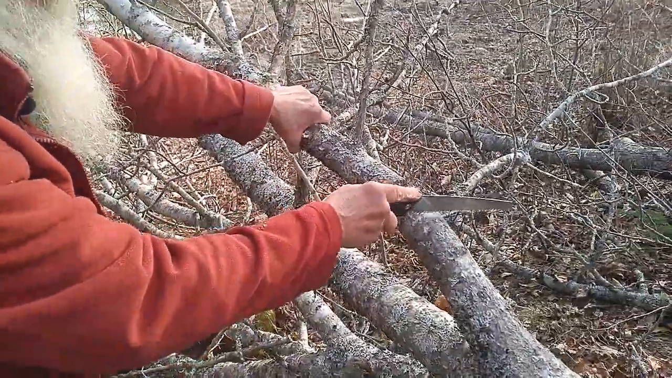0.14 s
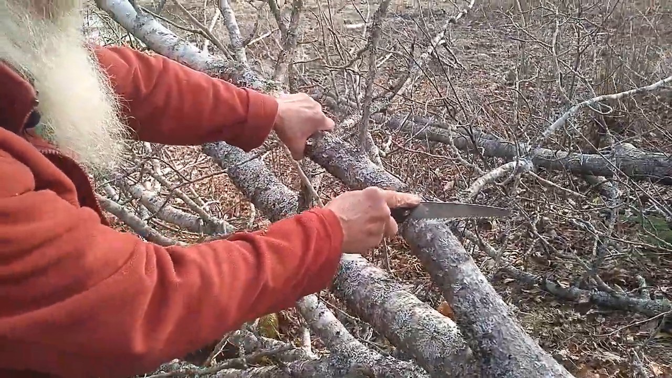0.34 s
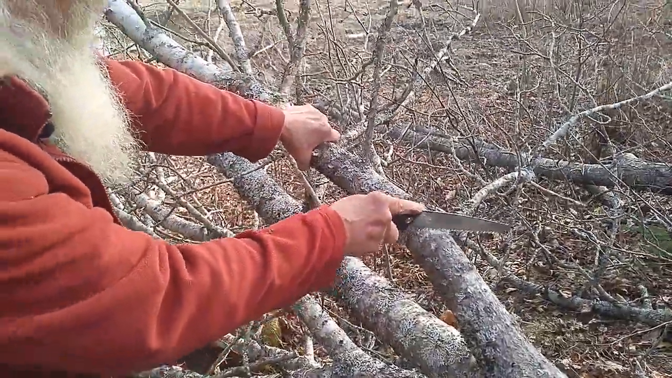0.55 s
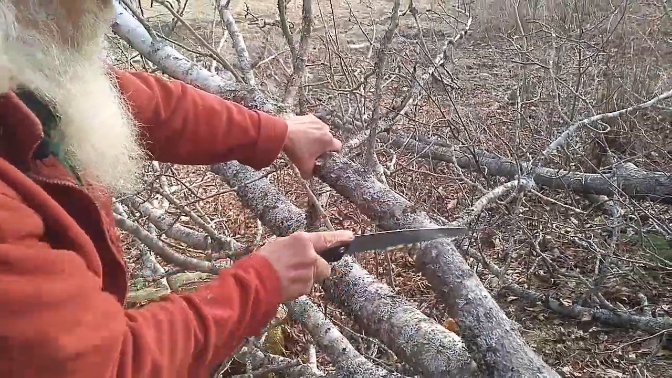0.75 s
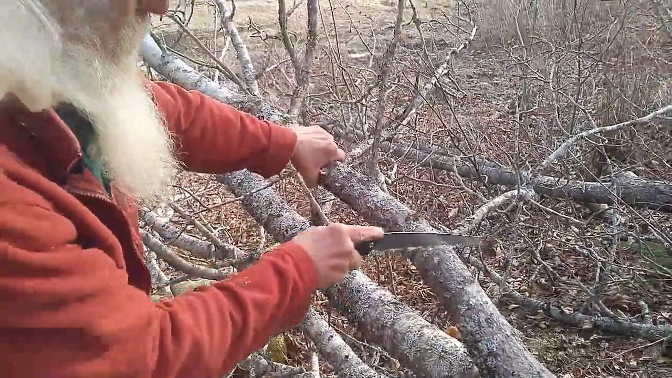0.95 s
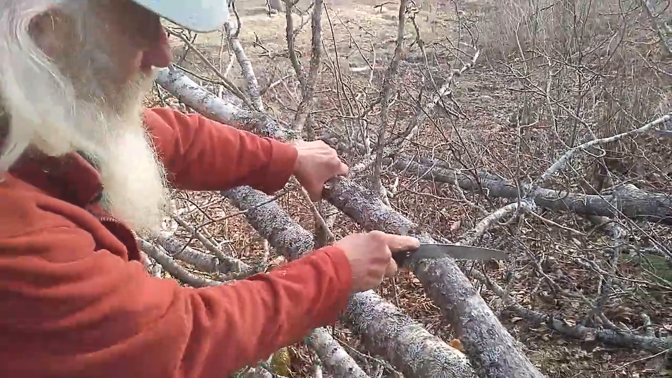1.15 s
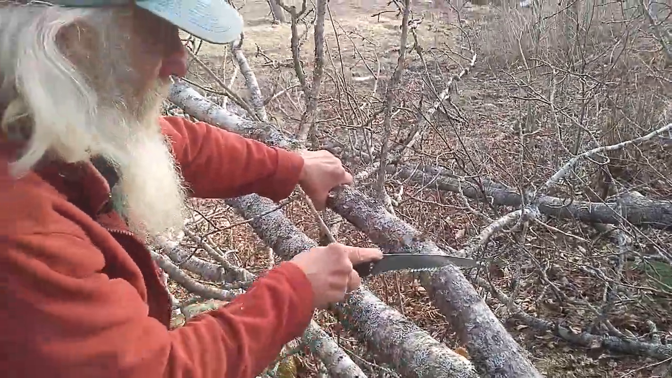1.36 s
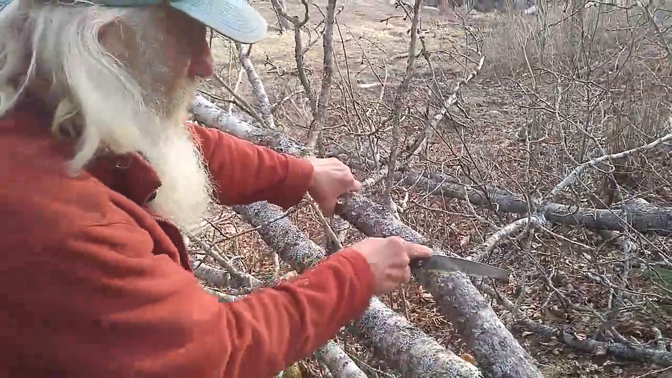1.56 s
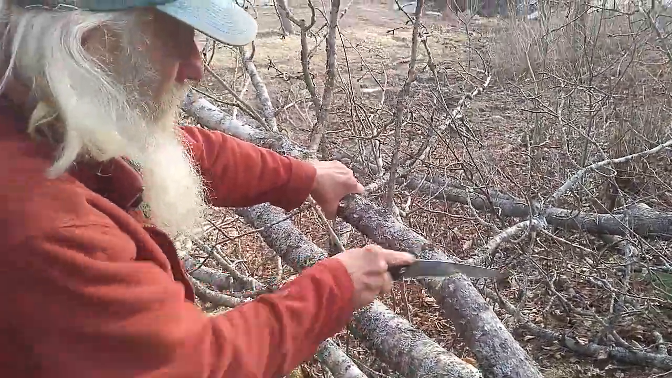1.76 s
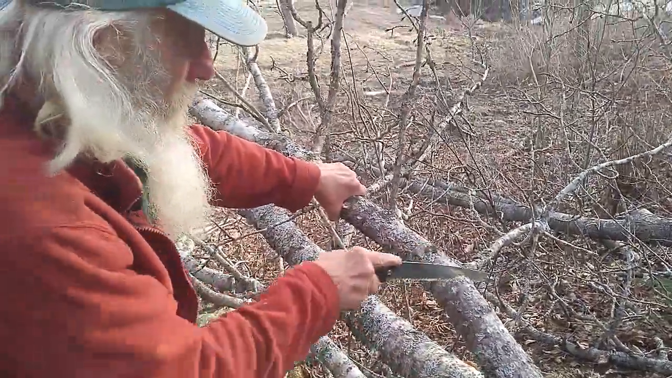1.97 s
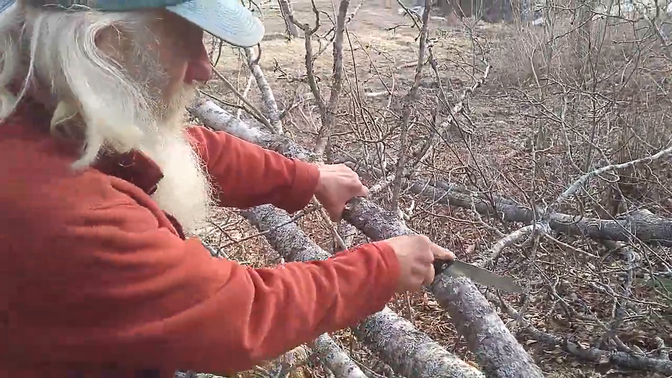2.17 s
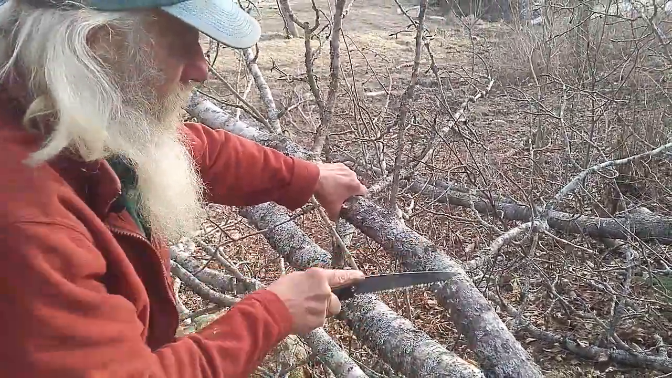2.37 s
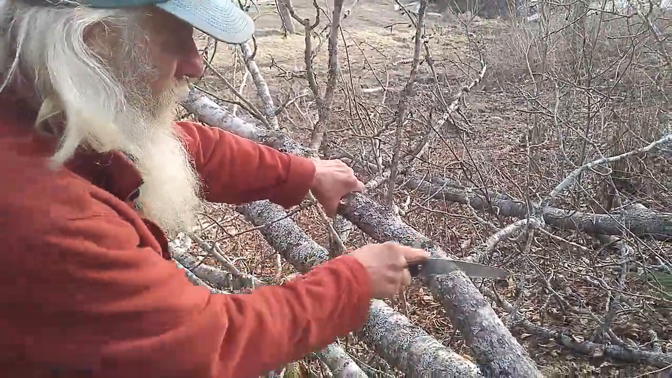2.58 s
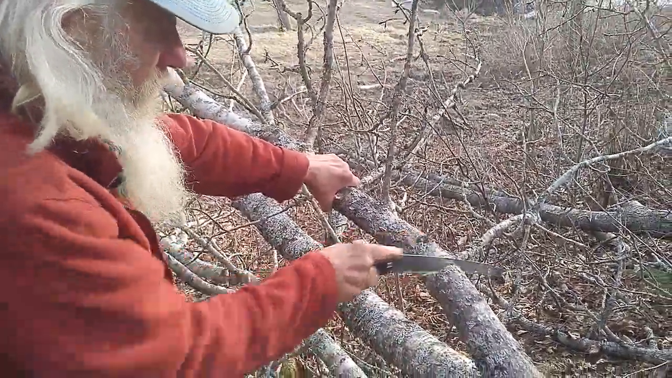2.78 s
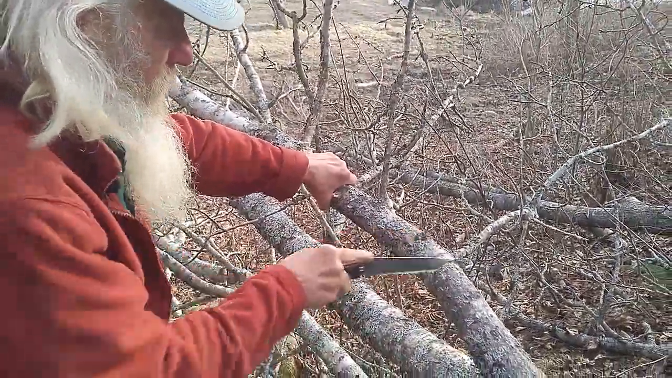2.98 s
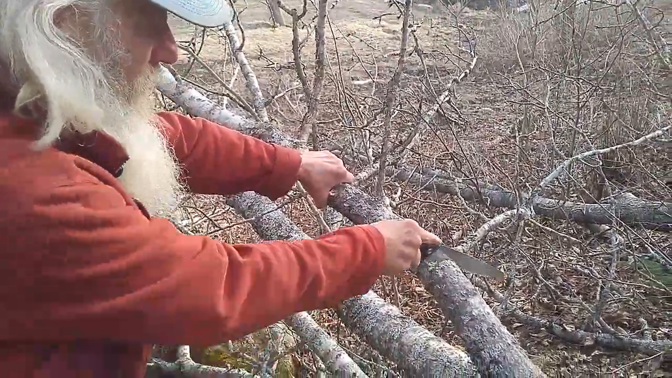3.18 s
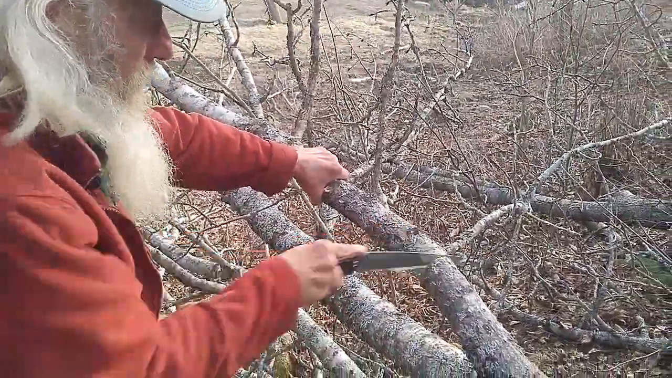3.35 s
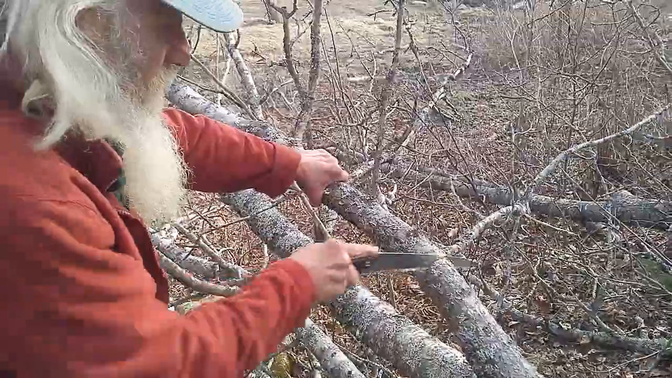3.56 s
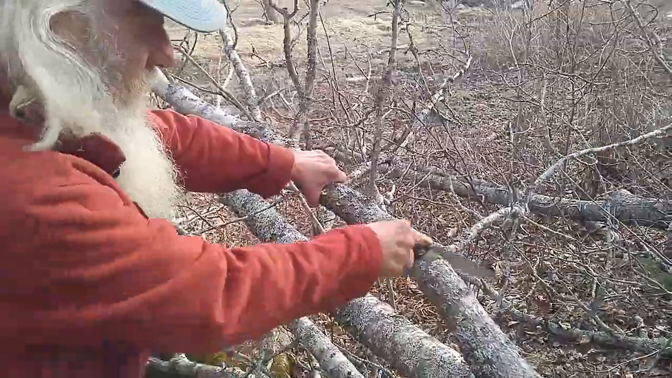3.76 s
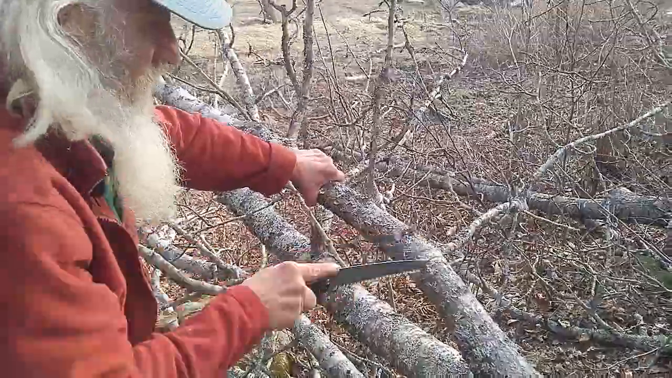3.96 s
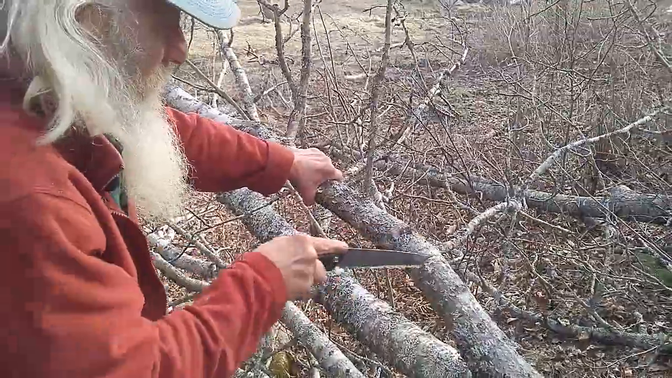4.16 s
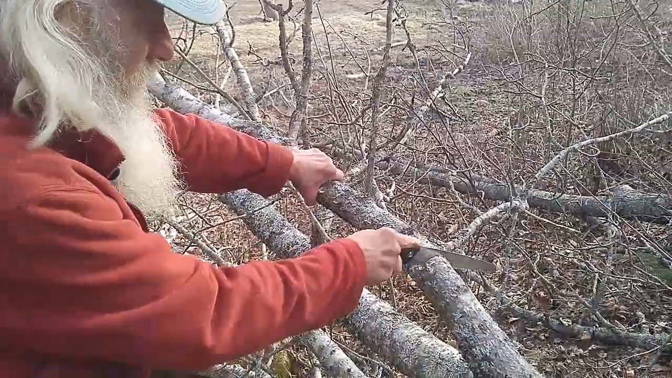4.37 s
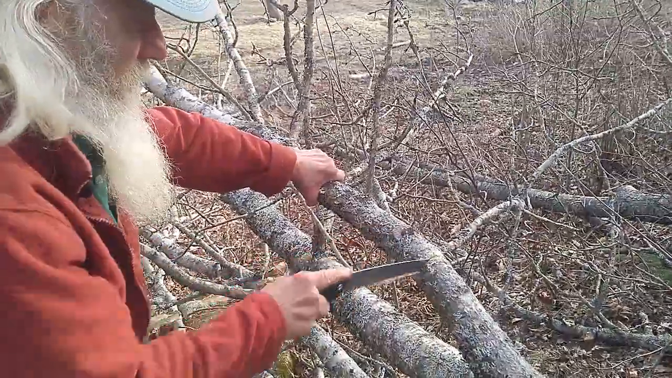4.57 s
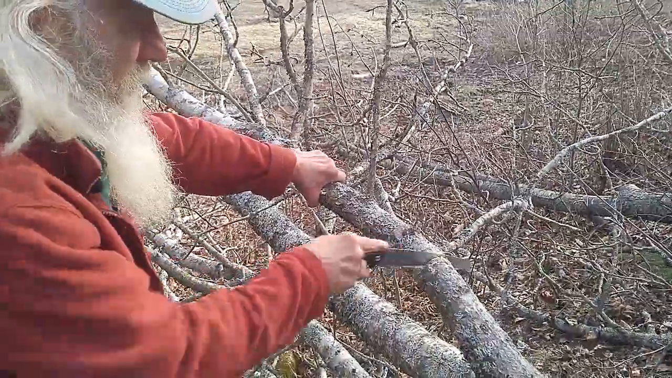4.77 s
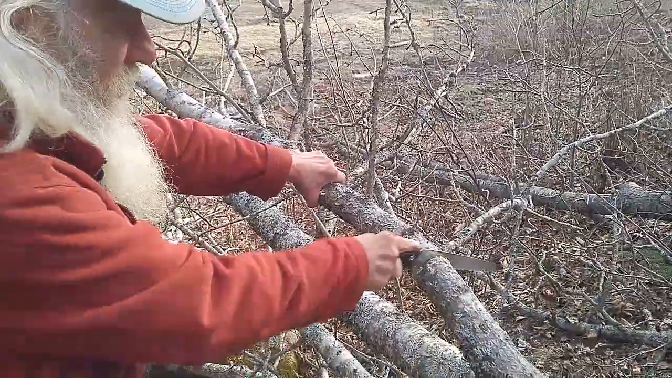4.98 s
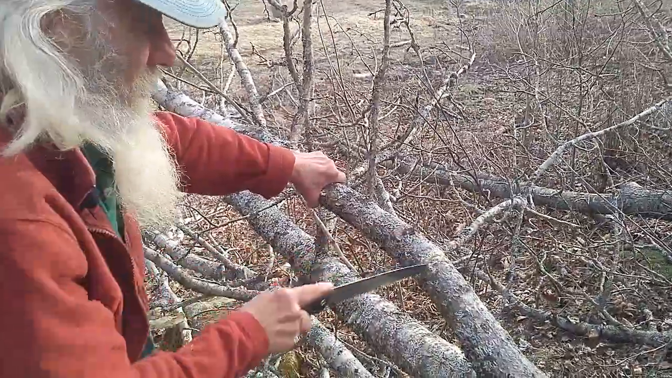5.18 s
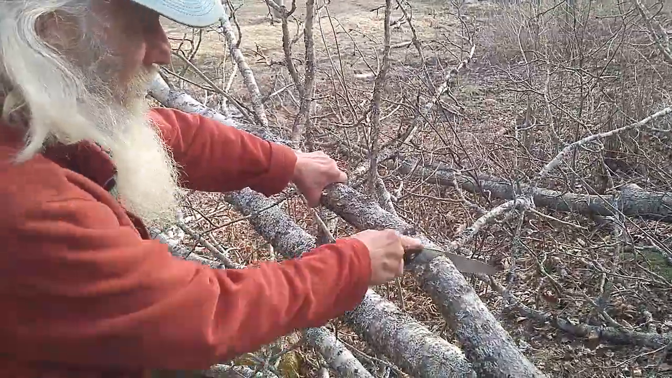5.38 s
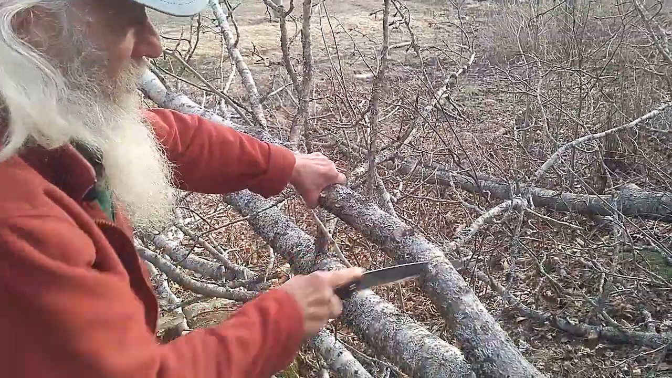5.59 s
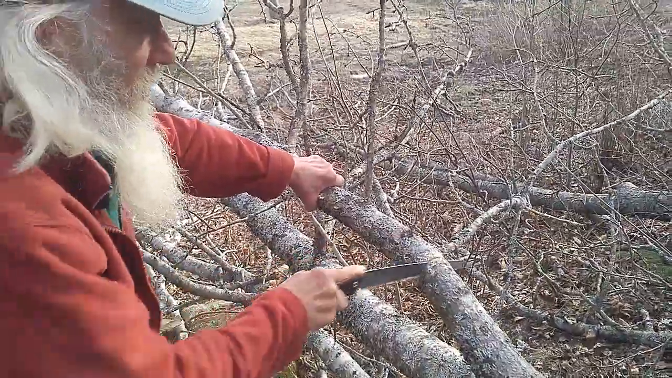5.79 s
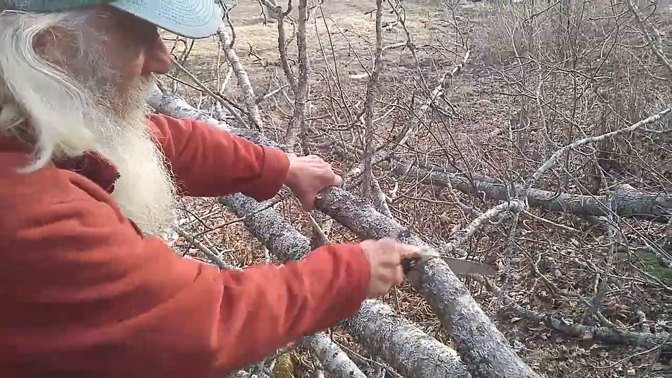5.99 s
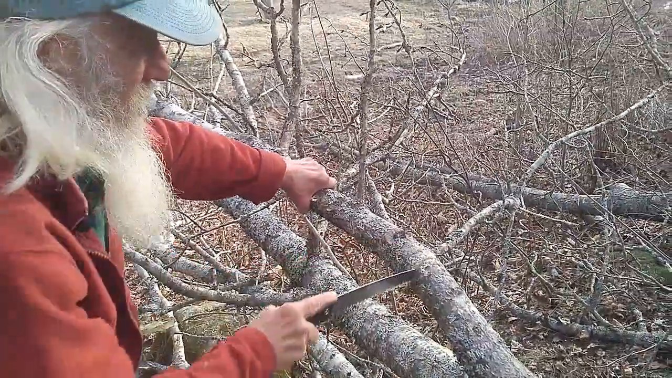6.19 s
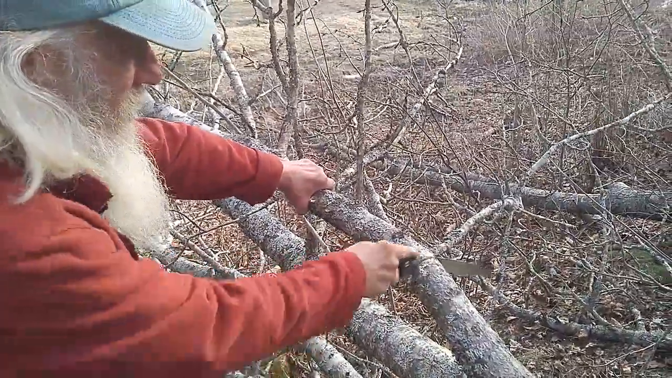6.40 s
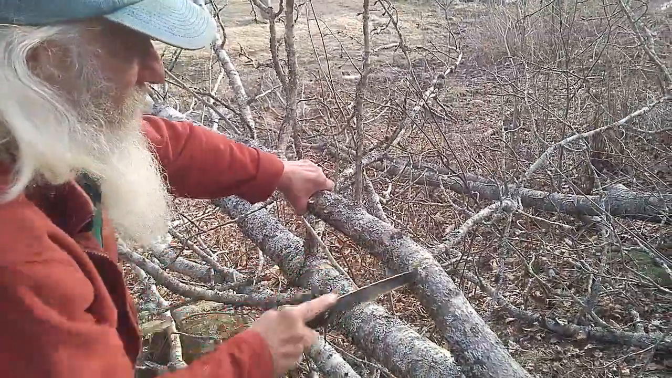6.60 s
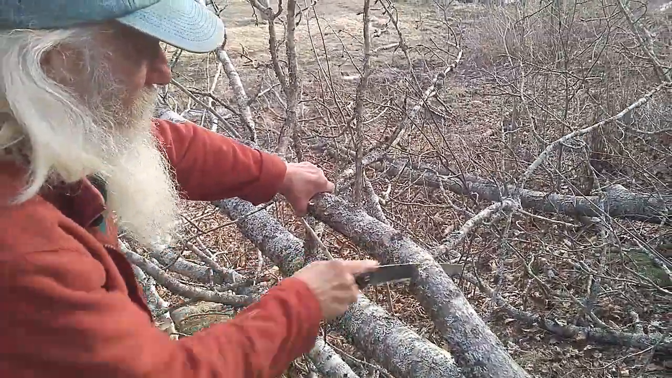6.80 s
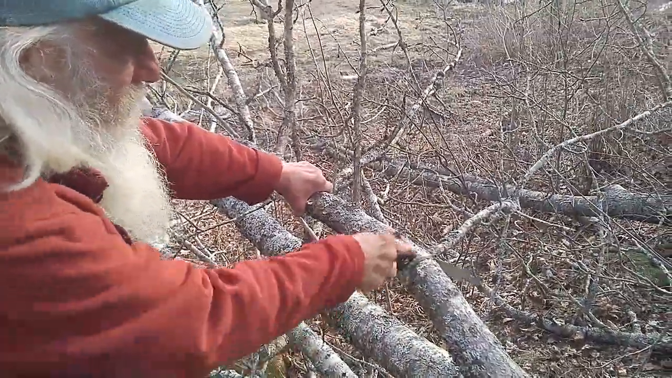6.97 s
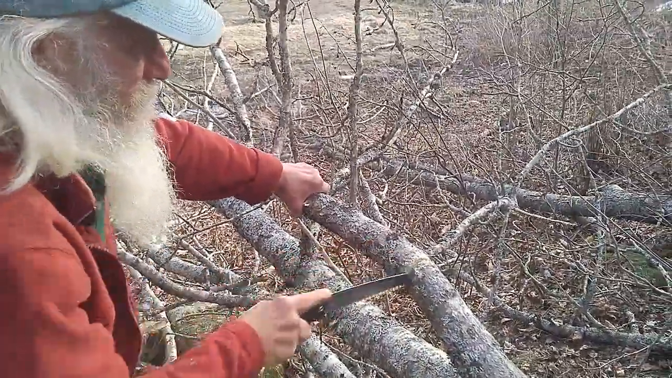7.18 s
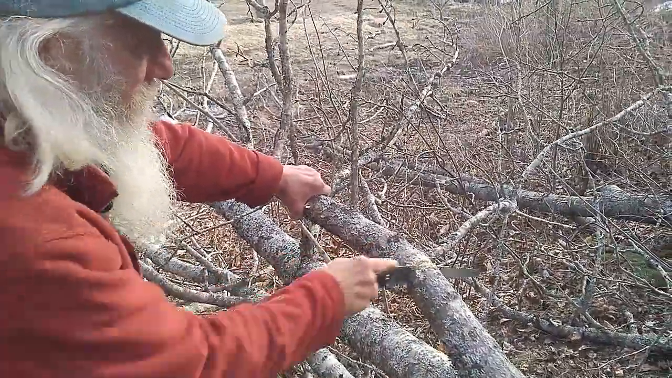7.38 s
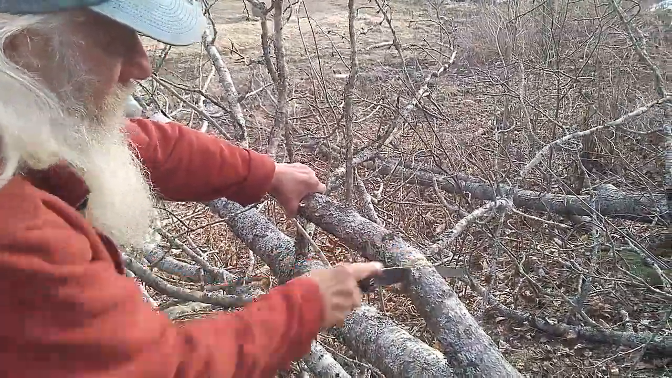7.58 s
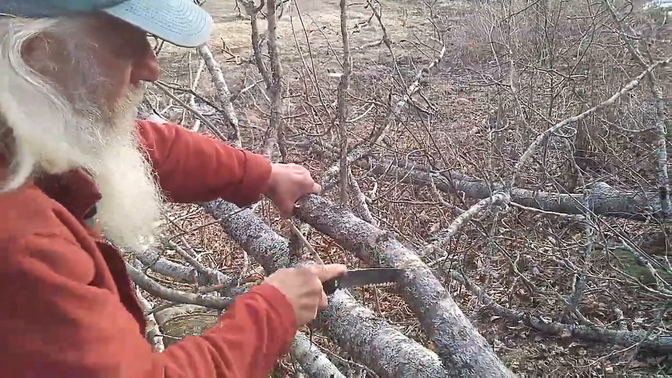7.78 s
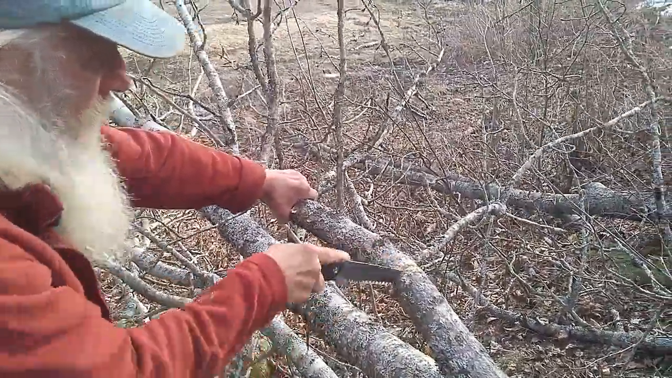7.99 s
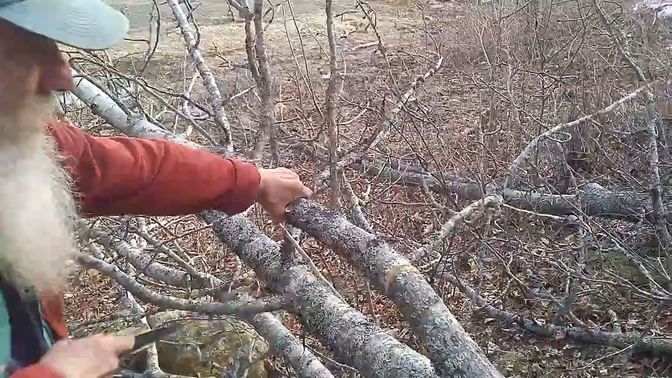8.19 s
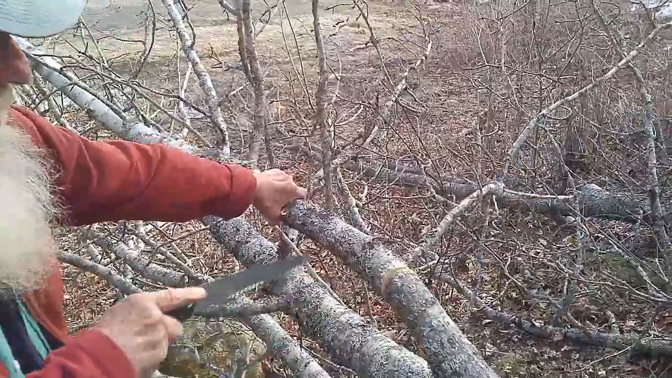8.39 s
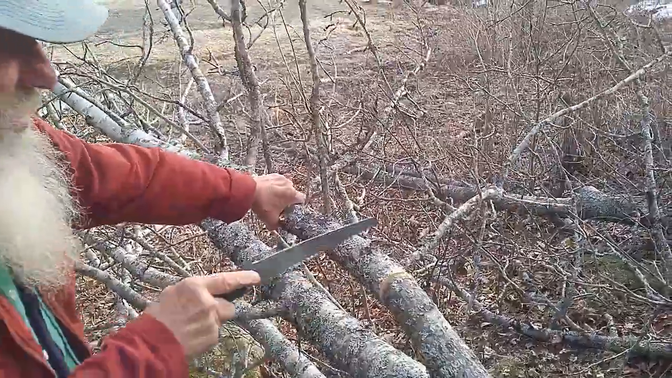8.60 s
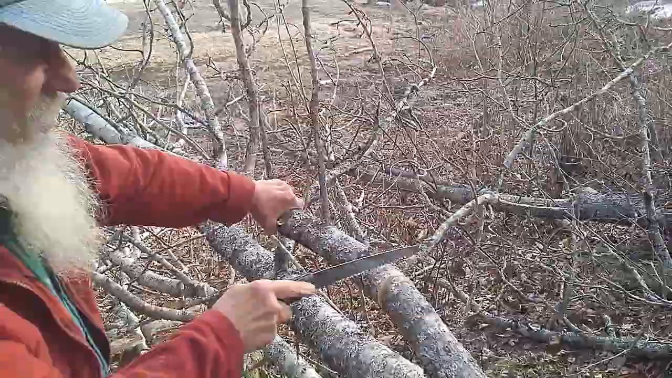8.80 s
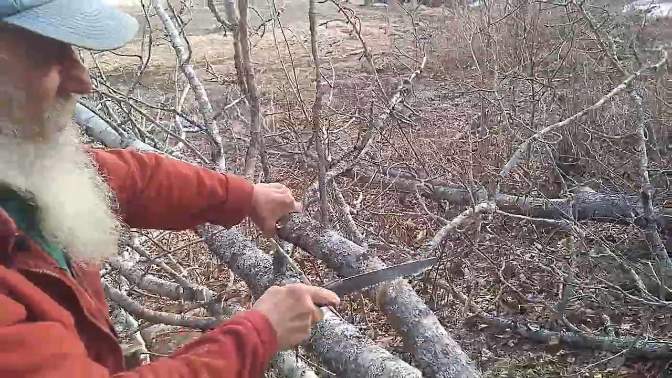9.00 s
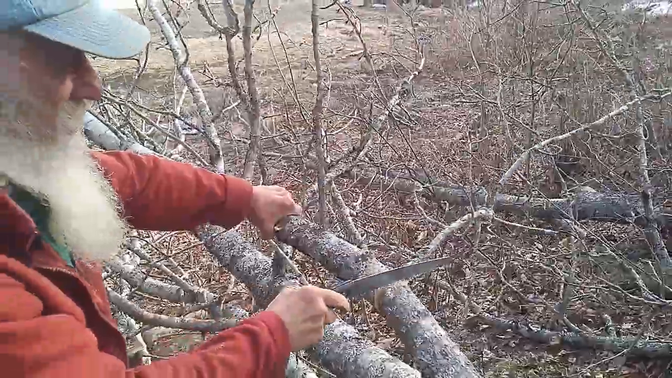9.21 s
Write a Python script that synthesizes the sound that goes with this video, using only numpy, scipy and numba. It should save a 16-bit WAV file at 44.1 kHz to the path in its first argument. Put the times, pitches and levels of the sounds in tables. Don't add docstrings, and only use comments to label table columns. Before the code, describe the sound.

Close dry sawing strokes, strong pulls and lighter returns, with loud cracks building to a branch breaking, then brief rustle and small knocks.

```python
import sys
import numpy as np
from scipy import signal
from scipy.io import wavfile
from scipy.ndimage import uniform_filter1d
from numba import njit

SR = 44100
rng = np.random.default_rng(int(sys.argv[2]) if len(sys.argv) > 2 else 0)


def ratio_of_db(decibels):
    return 10 ** (np.asarray(decibels, float) / 20)


def transcribe(signal):
    frames = np.atleast_2d(signal).T
    limited = np.clip(frames, -1, 1)
    pcm = np.round(limited * 32767).astype(np.int16)
    wavfile.write(sys.argv[1], SR, pcm)


N = 407925

# start t/s, length/s, biting level/dB, crest level/dB, release/s
PULLS = [(.665, 0.275, -47, -42.5, 0.07), (1.255, .19, -44.5, -43.5, 0.024),
         (1.777, 0.2, -44.5, -42.5, 0.023), (2.259, 0.23, -46, -40, 0.038),
         (2.786, 0.22, -45, -40.5, 0.029), (3.28, 0.26, -49.5, -39, 0.025),
         (3.826, 0.27, -48.5, -37.5, 0.058), (4.522, 0.21, -45, -38, 0.037),
         (5.029, 0.24, -51.5, -36, 0.044), (5.562, 0.23, -44.5, -39, 0.049),
         (6.09, 0.21, -47.5, -36, 0.029), (6.589, 0.23, -45.5, -35.5, 0.068),
         (7.101, 0.24, -39.5, -37.5, 0.053), (7.644, 0.18, -41.5, -38.5, 0.037)]
BITES_S = [.035, .04, 0.036, .043, .018, 0.043, 0.04, .035, .04, 0.029, 0.029, .018, 0.029, .025]
JOLT_DB = [-53, -55, -46.5, -48, -49.5, -49, -47, -50.5, -48, -50, -48, -52, -54, -47.5]
# start t/s, rest level at the turn before/dB, crest level/dB, rise/s, hold/s
PUSHES = [(0.949, -62, -54, 0.07, 0.13), (1.522, -72.5, -53.5, 0.045, 0.13),
          (2.038, -70, -49.5, 0.055, 0.069), (2.535, -64.5, -50.5, 0.07, 0.083),
          (3.04, -68.5, -49.5, 0.087, 0.073), (3.59, -68, -46.5, 0.092, 0.025),
          (4.225, -65.5, -50.5, 0.11, 0.084), (4.795, -71, -49, 0.096, .04),
          (5.308, -65, -47, 0.083, 0.028), (5.81, -63, -45.5, 0.13, 0.029), (6.36, -62, -46, 0.078, 0.019),
          (6.869, -55.5, -45.5, 0.09, 0.022), (7.378, -65, -46.5, 0.039, .08)]
# t/s, level/dB
RUSTLE = [(0.0, -62), (.317, -85), (.619, -63.5), (7.872, -65), (8.098, -68.5), (8.158, -71), (8.174, -58),
          (8.181, -38.5), (8.245, -39.5), (8.263, -58.5), (8.279, -60.5), (8.345, -53.5), (8.396, -69),
          (8.637, -88.5), (8.659, -53), (8.722, -69), (9.02, -73.5), (9.08, -68), (9.249, -74)]
# t/s, tilt to the upper rings/(dB/octave), tips level/dB, limb level/dB
BLADE_ANGLE = [(.8, -0.3, 1, -0.1), (1.1, 0.5, 1, 0.5), (1.35, 0.5, 0.7, 0.5), (1.63, -0.5, -0.5, .1),
               (1.88, -0.5, -0.3, -0.1), (2.13, -2, -0.5, 0.5), (2.38, -0.3, .1, 0.7),
               (2.65, -0.5, -0.5, -0.3), (2.9, 1.5, -1, .1), (3.15, -2.1, -2, -0.5), (3.43, 0.8, -1.5, 0.5),
               (3.68, 1.5, -0.5, .1), (3.96, 0, 3.1, 0), (4.35, -1, -1, -0.3), (4.63, 1.5, -0.5, -1),
               (4.9, -1.5, 1, 0.2), (5.16, 0, .1, -0.2), (5.42, -1, 0.5, 0.5), (5.68, 0.7, 0.3, 0),
               (5.95, 0.5, 0, 0.4), (6.2, -1, -1, 0.8), (6.44, 1.1, -1.5, .1), (6.69, 0.5, 0, -0.5),
               (6.96, -0.5, -1.2, 1.5), (7.2, -1.5, -2.1, -1), (7.47, 0.5, -0.5, -0.5), (7.72, 1, -1, 0.3),
               (8.21, -2.1, 1.5, 1.7)]
# loudest t/s, top tooth rate f/Hz, level/dB, lead of the top speed/s
TEETH = [(0.819, 218, -48.5, .055), (1.151, 141.8, -49.5, .03), (1.35, 300, -53, -.055),
         (1.89, 224, -45, 0.011), (2.14, 234, -44, 0.032), (2.41, 246, -43.5, 0.021),
         (2.67, 256, -48, 0.043), (2.911, 280, -41, 0.023), (3.191, 255, -49.5, .05),
         (3.474, 267.8, -42, 0.037), (3.7, 306, -50.5, 0.026), (3.961, 252.2, -44.5, .002),
         (4.34, 228, -50.5, 0.0038), (4.955, 250, -51, 0.073), (5.17, 335, -53, .005),
         (5.415, 281, -46, 0.026), (5.695, 245.6, -47, -0.0021), (5.94, 301, -48.5, 0.01),
         (6.371, 192, -54, -0.019), (6.95, 153, -42, 0.028), (7.275, 240, -50.5, 0.026),
         (7.54, 203, -53, 0.07)]
# first f/Hz, last f/Hz, width/Hz, level/dB
BLADE_RINGS = [(1888, 1853, 200, -0.1), (2344, 2170, 460, -3.5), (3190, 2750, 320, -5.5),
               (3350, 3000, 253, 4), (3730, 3530, 300, -6), (5000, 4850, 200, .6), (5640, 5310, 260, 2),
               (6100, 5640, 350, -1.5), (4180, 4560, 1800, -4), (7070, 6520, 1700, -6)]
TIP_RINGS = [(9400, 8100, 12000, 1.3), (11250, 10400, 3300, 7), (14260, 13500, 6800, 1)]
WOOD_RINGS = [(160, 124, 136, -3), (250, 226, 127, 1.5), (327, 327, 39, 2), (473, 430, 45, -14.5),
              (613, 654, 193, 1), (802, 860, 142, -5), (1107, 1100, 860, -8)]
# t/s, peak level/dB, ring f/Hz, thud share/dB, brightness/dB
CRACKS = [(0.3403, -52, 11500, -18, -1), (4.0237, -12.5, 3420, -14, -1.5), (4.1937, -35, 2870, -20, -9),
          (4.2049, -35.5, 5934, -32, 3), (5.1837, -21, 6025, -18, 1), (5.2281, -17.5, 3220, -19.5, -0.5),
          (5.524, -35, 2977, -30, -9), (5.5829, -35, 1940, -21, 6), (5.7307, -24, 3190, -16, 0),
          (6.1021, -37.5, 1720, -12, 2), (6.2146, -8.5, 3200, -22.5, -2.5), (6.245, -9.5, 4570, -19, -1.5),
          (6.2707, -26.5, 4540, -22, 2), (6.3037, -49, 11000, -15, 6), (6.312, -13, 2000, -13, -1.5),
          (6.3562, -39.5, 4820, -32, 3), (6.7175, -13, 5000, -21, 2.5), (6.7344, -18, 5330, -37, 5),
          (6.7404, -17, 3090, -15.5, 1), (6.7555, -22, 4820, -15, 1), (6.7868, -15.5, 1000, -24, -0.5),
          (7.2581, -9, 3300, -17.5, 0), (7.2707, -19.5, 5100, -32, 0), (7.2751, -17, 3230, -21, 1),
          (7.2946, -18.5, 5010, -17, 0.5), (7.3169, -18, 3150, -17.5, 0)]
SNAP = [
    (7.7637, -11, 2970, -16, -1),
    (7.77, -13.5, 900, -15.5, -1),
    (7.7756, -5.5, 5640, -16.5, 0),
    (7.7791, -3.5, 4300, -15, 1),
    (7.8092, -34, 10970, -30.5, 1),
    (7.8578, -42, 12000, -32, 2),
]
TWIGS = [(8.1285, -21.5, 3300, -12, -1), (8.167, -22.5, 3300, -19, -2), (8.2403, -19.5, 5300, -15, -2),
         (8.5316, -54, 1120, -7, -6), (8.6468, -35.5, 4500, -17, -7), (8.6552, -27.5, 3900, -15.5, -1.5),
         (9.0791, -44, 7490, -32, -1), (9.1881, -44.5, 11000, -30, 9), (9.0365, -45, 1500, -16, 0),
         (9.122, -47, 3000, -30, -1), (9.067, -52, 6000, -30, 3), (8.93, -52, 7000, -30, 4),
         (8.76, -49, 6500, -30, 3), (8.428, -51.5, 10000, -28.5, 3), (9.135, -48, 1600, -20, -8),
         (9.172, -51, 1700, -20, -8), (9.21, -52, 9000, -30, 5), (9.24, -52, 7500, -30, 3),
         (9.193, -48, 6500, -30, 3), (9.165, -51, 11000, -30, 8), (9.221, -51, 13000, -30, 9),
         (8.884, -53, 14500, -30, 6), (8.787, -55, 13000, -30, 8), (8.795, -52, 2000, -30, -6),
         (9.128, -50, 5500, -30, -1), (9.083, -49, 1500, -25, -2)]
CATCHES = [(1.51, -53, 1500, -25, -8), (2.8, -39, 5800, -22, 1), (7.116, -38, 3000, -22, -3),
           (7.637, -40, 5500, -23.5, -1), (7.658, -34, 3000, -22, -4), (4.112, -44, 3400, -25, 4),
           (4.254, -48, 7030, -30, 4), (6.3445, -44, 10000, -30, 9), (5.068, -35, 5640, -25, 4),
           (5.555, -46, 10500, -30, 9), (5.787, -48, 2970, -25, 0), (6.599, -35.5, 2800, -25, 3),
           (3.853, -41, 2170, -25, 5), (6.324, -38, 4500, -25, -5), (7.56, -42, 4200, -25, 0)]
# f/Hz, width/Hz, level/dB
KNOCK = [(231, 18, -7.5), (466, 26, 0.5), (612, 59, -2.5), (1000, 144, 2)]
# t/s, peak
# level/dB, ring f/Hz, T60/s
BUMPS = [(7.7805, -22.5, 254, .075), (7.7802, -22, 465, 0.069), (7.783, -28, 330, 0.065),
         (.93, -40, 310, 0.037), (5.3, -40, 150, 0.092), (8.129, -36, 350, 0.029),
         (9.036, -38.5, 167, 0.068), (8.657, -40, 259, 0.092), (8.68, -49, 110, 0.12),
         (8.751, -43.5, 750, 0.024), (8.7802, -36.5, 1020, 0.011), (9.0365, -31.5, 360, 0.025),
         (9.056, -43, 400, 0.034), (9.106, -49, 135, .08), (9.156, -47, 1500, .015),
         (8.403, -47.5, 800, .02), (8.532, -51, 590, .03), (8.575, -47.5, 660, .035), (8.6, -55, 620, .04),
         (7.781, -26, 1000, .05), (7.795, -31.5, 760, .03)]
# t/s, level/dB
GUST = [(0.0, -77), (.64, -72), (1.1, -61), (1.5, -61.5), (4.02, -57.5), (4.2, -67), (5.2, -51), (6.5, -63),
        (7.42, -57.5), (8.14, -59.5), (8.22, -41.5), (8.3, -34), (8.37, -46.5), (8.4, -40), (8.45, -65),
        (8.97, -68), (9.04, -59), (9.25, -74.5)]
# t/s, f/Hz, level/dB
BIRD_CALLS = [
    [(4.478, 6814, -63), (4.502, 7465, -55), (4.54, 7768, -63)],
    [(8.95, 6972, -64), (8.978, 7848, -63), (9.03, 7900, -72)],
]
# t/s, level/dB
INSECT_LEVEL = [(0, -76), (.5, -78), (.9, -80), (1.2, -95), (9.25, -95)]
# f/Hz, level/dB
AIR_COLOUR = [(53, -31), (90, 5), (658, -3), (749, -8.5), (971, -20), (1080, -22.5), (1180, -17.5),
              (7410, -16.5), (15800, -35)]
# t/s, level/dB
BREEZE = [(0, -2.5), (.7, -1.5), (1.5, 0), (8.3, 2), (8.6, -1.5), (8.7, -4), (9.0, -1.5), (9.25, 1.1)]
# t/s, level/dB
DRONE_LEVEL = [(0, -67.5), (.3, -68), (.6, -71), (1.5, -74.5), (8.9, -80.5), (9.05, -52.5), (9.25, -95)]


def saw():
    usual_db, free_db, free_span_db = -45, -62.5, 6
    in_wood_s, out_of_wood_s = 0.66, 8.26
    s, rasp_db, muffled_db = arm()
    t = np.arange(N) / SR
    rasp_now_db = np.interp(t, s, rasp_db)
    wood_db = -3.5 - 0.26 * (rasp_db - usual_db)
    tips_db = -2 + 0.17 * (rasp_db - usual_db) + muffled_db

    hz, gain = voiced(teeth(), 0.019)
    phase = 2 * np.pi * np.cumsum(hz * (1 + 0.02052 * walk(90))) / SR
    pulse = np.cos(phase) + 0.5 * np.cos(2 * phase) + 0.46 * np.cos(3 * phase)
    hum = np.sqrt(2) * gain * ratio_of_db(1.15 * walk(60)) * pulse

    force = (1 + 0.11 * np.cos(phase)) * ratio_of_db(1.7 * walk(40)) * grit(1.98)
    lean_db, keen_db, limb_db = read(BLADE_ANGLE)
    tilt_db = 0.39 * np.clip(rasp_now_db + 46, -10, 8) + lean_db
    blade = ring(force, BLADE_RINGS, flicker_db=2.5, rate_hz=30, drift=0.025, tilt_db=tilt_db)

    rustle = level(svf(force * rng.standard_normal(N), 4250.0, 6200.0), 2.17)
    touch = np.clip((rasp_now_db - free_db) / free_span_db, 0, 1)
    touch = touch * ((t > in_wood_s) & (t < out_of_wood_s))
    blade = swell(s, rasp_db + 0.39) * (np.sqrt(touch) * blade + np.sqrt(1 - touch) * rustle)

    tips = ring(force, TIP_RINGS, flicker_db=3.3, rate_hz=23, drift=0.033)
    tips = swell(s, rasp_db + np.minimum(tips_db, 2) + 0.23) * tips
    wood = ring(force * ratio_of_db(0.84 * walk(150)), WOOD_RINGS, flicker_db=4, rate_hz=25, drift=0.048)
    wood = swell(s, rasp_db + wood_db + 1.0) * wood
    return hum + blade + ratio_of_db(keen_db) * tips + ratio_of_db(limb_db) * wood


def arm():
    turn_db, lift_db = -63, -7.5
    ease_s, ease_db = 0.044, -6
    set_in_s, set_in_db, sag_db, reverse_s = 0.017, -8, -0.5, 0.016
    loose_tips_db = -6
    points = [(s, db, loose_tips_db) for s, db in RUSTLE]

    rests_db = [push[1] for push in PUSHES] + [turn_db + 4.5]
    for (s, length_s, bite_db, crest_db, release_s), bite_s, rest_db in zip(PULLS, BITES_S, rests_db):
        dull_db = -9 * (s / 8.1) ** 3
        release_at_s = s + length_s - release_s
        points += [(s, turn_db, lift_db + dull_db),
                   (s + bite_s, bite_db, dull_db),
                   (release_at_s - ease_s, crest_db, 0),
                   (release_at_s, crest_db + ease_db, 0),
                   (s + length_s, rest_db, 0)]

    for (s, rest_db, crest_db, rise_s, hold_s), next_pull in zip(PUSHES, PULLS[1:]):
        points += [(s, rest_db, 0),
                   (s + set_in_s, crest_db + set_in_db, 0),
                   (s + rise_s, crest_db, 0),
                   (s + rise_s + hold_s, crest_db + sag_db, 0),
                   (next_pull[0] - reverse_s, turn_db - 1.0, lift_db)]
    return np.transpose(sorted(points))


def teeth():
    half_swing_s, into_step_s, in_step_s, out_of_step_db = 0.3, 0.09, 0.065, -18
    tables = []
    for s, top_hz, db, lead_s in TEETH:
        end_s = np.clip(0.38 * half_swing_s - lead_s, in_step_s, 0.115)
        late_s = np.linspace(-into_step_s, end_s, 13)
        away = np.where(late_s < 0, -late_s / into_step_s, np.minimum(late_s / in_step_s, 0.85))
        hz = top_hz * np.cos(np.pi * (late_s + lead_s) / half_swing_s).clip(0.35)
        tables.append(np.transpose([s + late_s, hz, db + out_of_step_db * away ** 1.23]))
    return tables


def ring(force, modes, flicker_db, rate_hz, drift, tilt_db=0):
    out = 0
    depth = np.clip(np.arange(N) / SR / 8.3, 0, 1) ** 0.97
    for first_hz, last_hz, width_hz, db in modes:
        hz = (first_hz + (last_hz - first_hz) * depth) * (1 + drift * walk(rate_hz / 2))
        gain = ratio_of_db(db + flicker_db * walk(rate_hz) + tilt_db * np.log2(first_hz / 3300))
        tone = svf(force * rng.standard_normal(N), hz, width_hz)
        out = out + gain * svf(tone, hz, 3 * width_hz)
    return out / np.sqrt(uniform_filter1d(uniform_filter1d(out ** 2, 1500), 1500))


def grit(spread_db):
    return np.repeat(ratio_of_db(spread_db * np.minimum(rng.exponential(1, N // 12 + 1), 4)), 12)[:N]


def cracks():
    size = 4000
    out, t = np.zeros(N + size), np.arange(size) / SR
    for s, db, hz, thud_db, bright_db in CRACKS + SNAP + TWIGS + CATCHES:
        noise = rng.standard_normal((3, size))
        burst = np.exp(-(t / 0.00097) ** 2) + ratio_of_db(-9.5) * np.exp(-t / 0.0056)
        late = np.roll(burst, int(0.0004 * SR))
        tear = svf(noise[0] * burst, 7000., 12000.) + 0.6 * svf(noise[0] * burst, 11500., 4000.)
        tear = peak(tear, bright_db - 1.5)
        own_ring = peak(svf(noise[1] * late, hz, 400 + 0.11 * hz), -1.6)
        rattle = peak(svf(noise[2] * late, 2300.0, 3100.0), -1.2 - bright_db)
        thud = peak(body(noise[2] * late, KNOCK), thud_db + 5.0)
        i = int(s * SR)
        out[i:i + size] += ratio_of_db(db) * (peak(tear + own_ring + rattle, 0.91) + thud)

    thumps = [(pull[0] - 0.031, -55.5 + 2.04 * pull[0], 136, 0.083) for pull in PULLS[1:]]
    for s, db, hz, t60_s in BUMPS + thumps:
        i = int(s * SR)
        onset = np.minimum(2 * hz * t, 1)
        out[i:i + size] += ratio_of_db(db - 60 * t / t60_s) * np.sin(2 * np.pi * hz * t) * onset
    return out[:N]


def sway():
    still_db, jolt_s = -68.5, 0.04
    jolts = []
    for (s, length_s, *_), db in zip(PULLS, JOLT_DB):
        end_s = s + length_s
        jolts += [(s - 0.01, still_db), (s + jolt_s, db), (end_s - jolt_s, db + 2.0), (end_s + 0.01, still_db)]
    push = rng.standard_normal(N) * ratio_of_db(1.4 * walk(13))
    shudder = level(svf(svf(push, 54.5, 24.0), 65.0, 100.0), 1.0)
    return np.hypot(swell(*np.transpose(jolts)), ratio_of_db(read(GUST)[0])) * shudder


def bird():
    hz, gain = voiced(BIRD_CALLS, 0.008)
    call = np.sqrt(2) * gain * ratio_of_db(4.4 * walk(120)) * np.sin(2 * np.pi * np.cumsum(hz) / SR)
    return call + ratio_of_db(-9) * np.roll(call, int(0.011 * SR))


def insects():
    shimmer = level(svf(rng.standard_normal(N), 8250., 600.), 0)
    return ratio_of_db(read(INSECT_LEVEL)[0] + 2.1 * walk(15)) * shimmer


def air():
    out, common = 0, walk(0.93)
    colour_hz, colour_db = np.transpose(AIR_COLOUR)
    for hz in 100 * 2 ** np.arange(0, 7.4, 0.5):
        db = np.interp(np.log(hz), np.log(colour_hz), colour_db) + 2.4 * common + 1.2 * walk(7.7)
        out = out + ratio_of_db(db) * svf(rng.standard_normal(N), hz, hz / 3)
    return ratio_of_db(read(BREEZE)[0]) * level(out, -65.5)


def drone():
    wash = svf(svf(rng.standard_normal(N), 300., 260.), 260., 500.) * ratio_of_db(1.5 * walk(12))
    return ratio_of_db(read(DRONE_LEVEL)[0]) * level(wash, 0)


def level(x, db):
    return x * ratio_of_db(db) / np.sqrt(np.mean(x ** 2))


def peak(x, db):
    return x * ratio_of_db(db) / np.abs(x).max()


def read(table):
    s, *columns = np.transpose(table)
    return [np.interp(np.arange(N) / SR, s, c) for c in columns]


def swell(s, db):
    return np.interp(np.arange(N) / SR, s, ratio_of_db(db / 3)) ** 3


def walk(rate_hz):
    k = int(SR / rate_hz)
    steps = np.repeat(rng.standard_normal(N // k + 1), k)
    return 1.29 * uniform_filter1d(uniform_filter1d(steps, k), k)[:N]


def voiced(tables, fade_s):
    hz, db = read(np.concatenate(tables))
    t = np.arange(N) / SR
    gate = 0
    for table in tables:
        inside_s = np.minimum(t - table[0][0], table[-1][0] - t)
        gate = gate + np.clip(inside_s / fade_s + 0.5, 0, 1)
    return hz, gate * ratio_of_db(db)


def body(x, modes):
    return sum((-1) ** k * ratio_of_db(db) * svf(x, hz, width_hz) for k, (hz, width_hz, db) in enumerate(modes))


def svf(x, hz, width_hz):
    return sweep(x, np.tan(np.pi * hz / SR) + 0 * x, width_hz / hz + 0 * x)


@njit
def sweep(x, g, k):
    y, band, low = np.empty(len(x)), 0., 0.
    for i in range(len(x)):
        v = (band + g[i] * (x[i] - low)) / (1 + g[i] * (g[i] + k[i]))
        band, low, y[i] = 2 * v - band, low + 2 * g[i] * v, k[i] * v
    return y


def scene():
    near = saw() + cracks()
    t = np.arange(6000) / SR
    trunks = rng.standard_normal(6000) * np.exp(-t / 0.028) * (t > 0.004)
    echo = signal.fftconvolve(near, trunks / np.linalg.norm(trunks))[:N]
    mono = near + ratio_of_db(-25) * echo + sway() + bird() + insects() + air() + drone()
    return np.array([mono, mono])


def top_cut(x):
    return signal.sosfilt(signal.butter(12, 17000, fs=SR, output="sos"), x)


def record(dry):
    x = signal.sosfilt(signal.butter(2, 38, "high", fs=SR, output="sos"), dry)
    x = signal.sosfiltfilt(signal.ellip(8, 0.1, 30, 15800, fs=SR, output="sos"), x)
    return top_cut(x)


dry = scene()
out = record(dry)
transcribe(out)
```